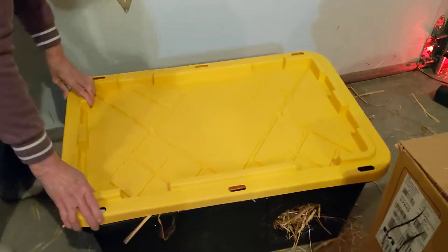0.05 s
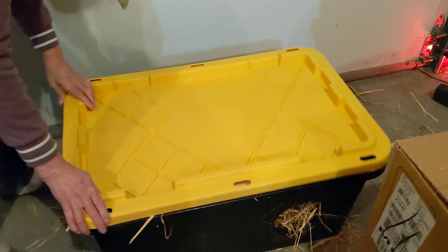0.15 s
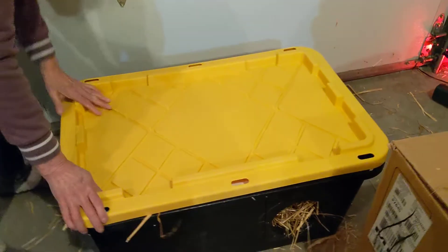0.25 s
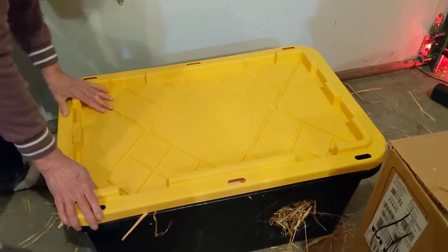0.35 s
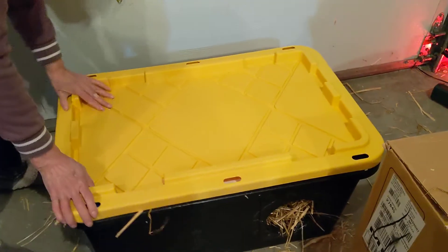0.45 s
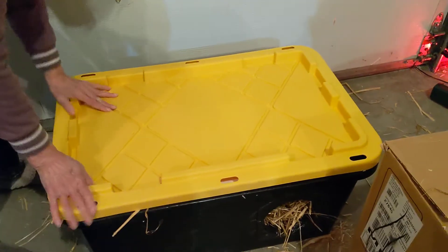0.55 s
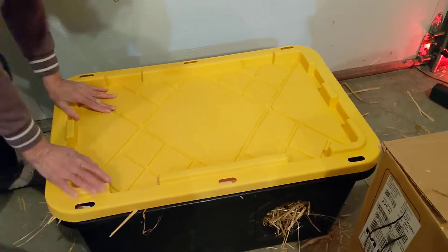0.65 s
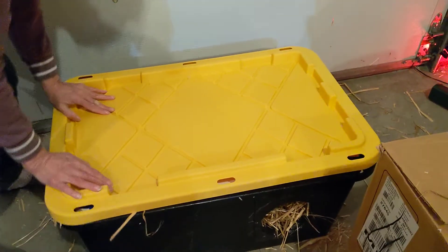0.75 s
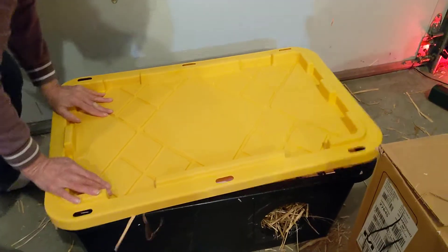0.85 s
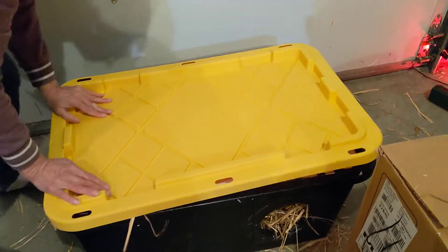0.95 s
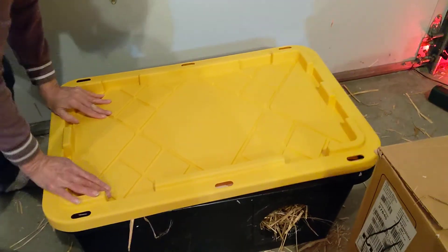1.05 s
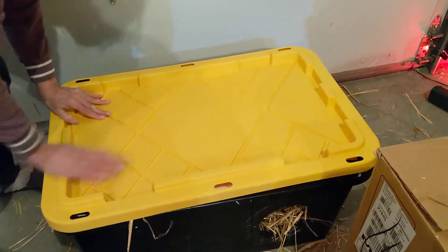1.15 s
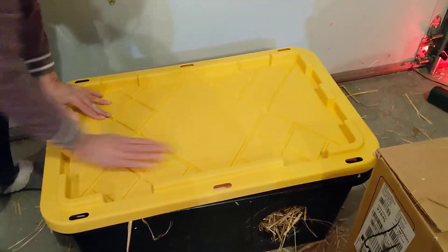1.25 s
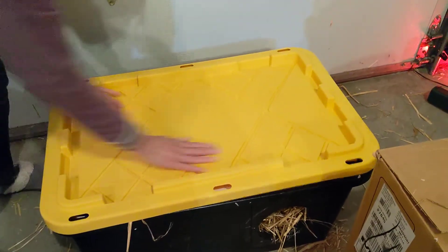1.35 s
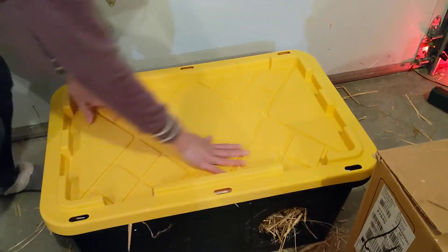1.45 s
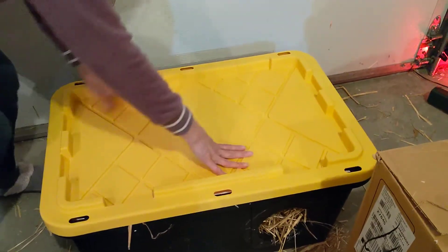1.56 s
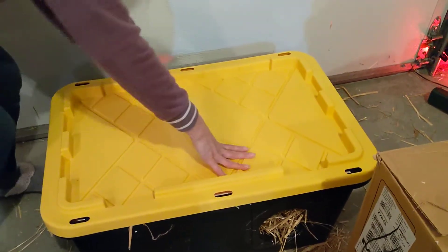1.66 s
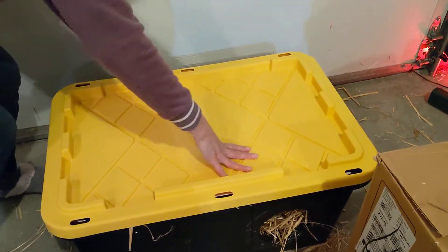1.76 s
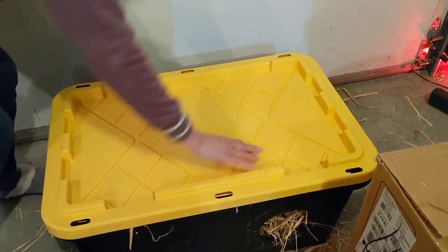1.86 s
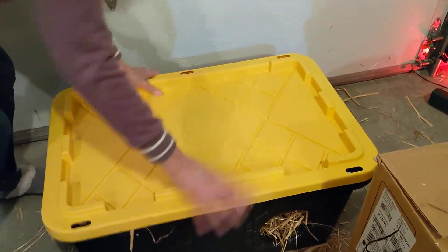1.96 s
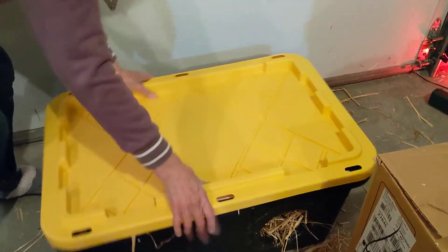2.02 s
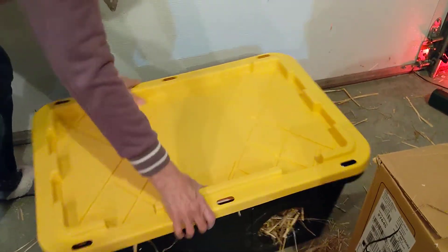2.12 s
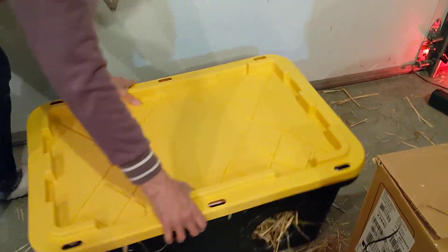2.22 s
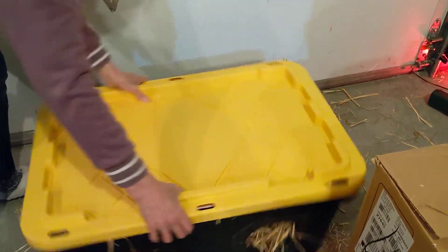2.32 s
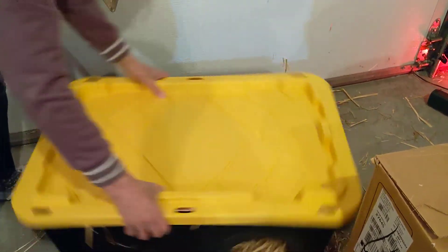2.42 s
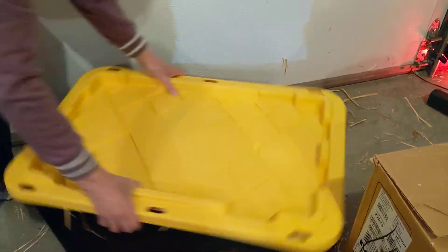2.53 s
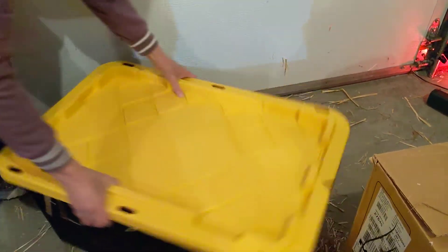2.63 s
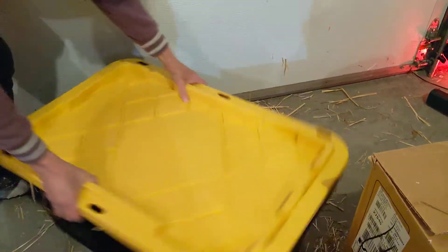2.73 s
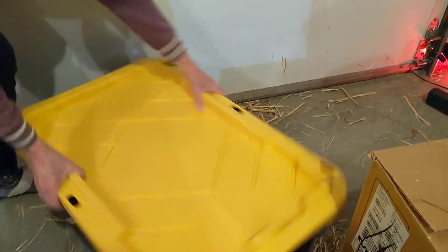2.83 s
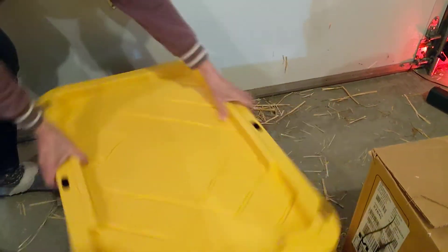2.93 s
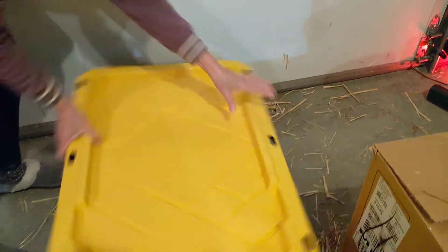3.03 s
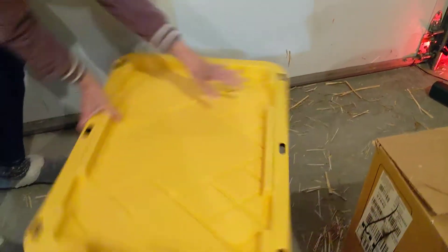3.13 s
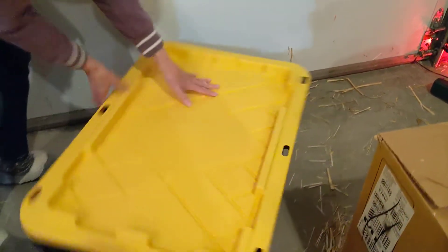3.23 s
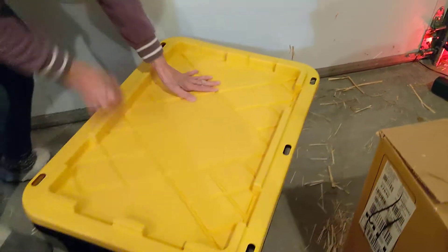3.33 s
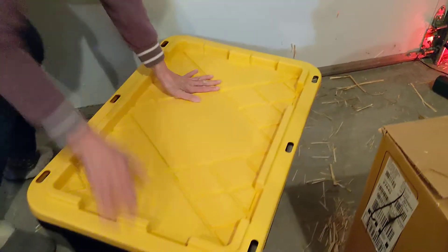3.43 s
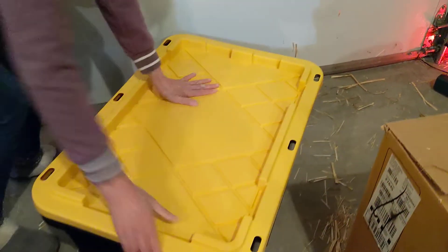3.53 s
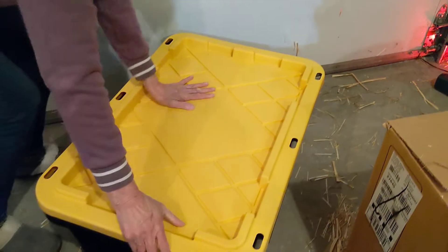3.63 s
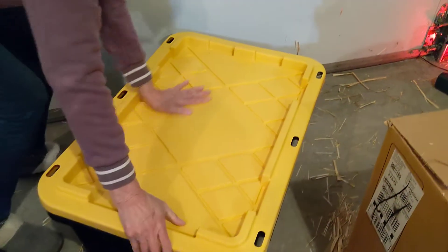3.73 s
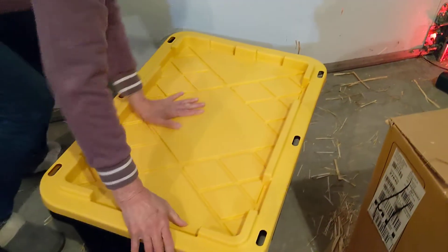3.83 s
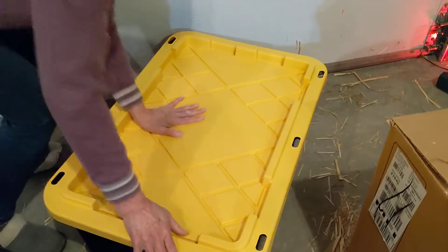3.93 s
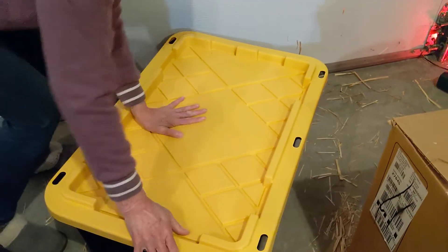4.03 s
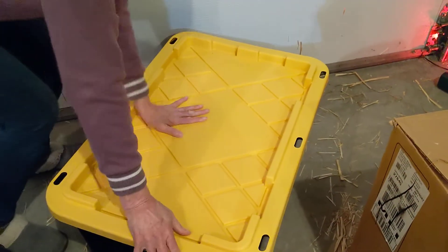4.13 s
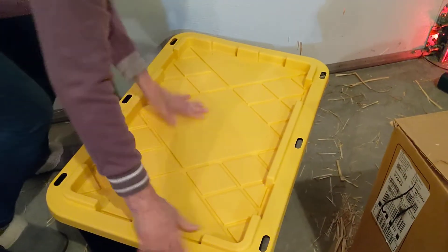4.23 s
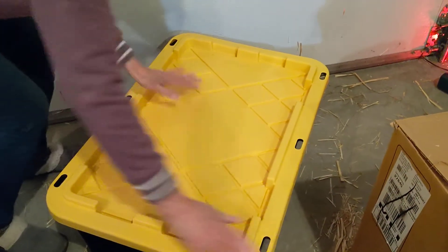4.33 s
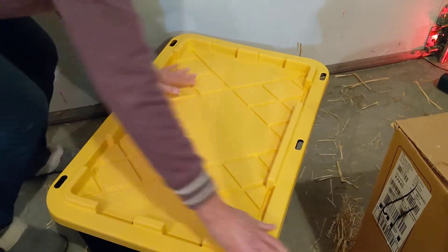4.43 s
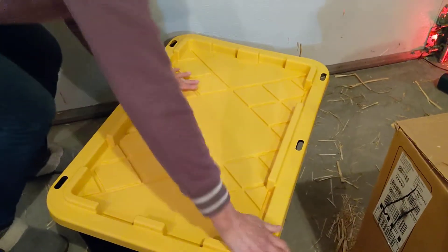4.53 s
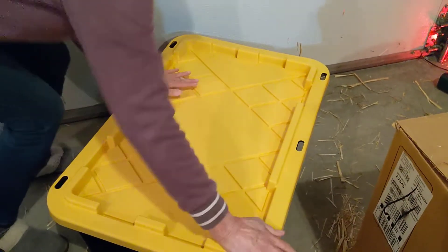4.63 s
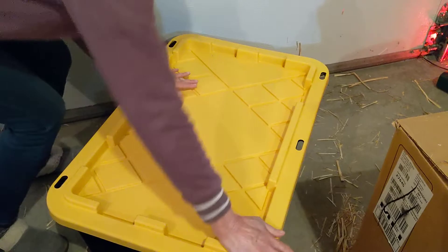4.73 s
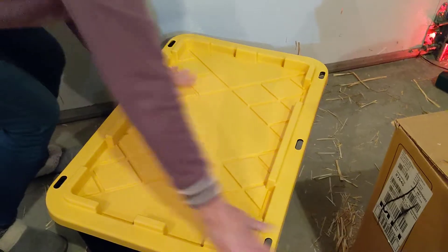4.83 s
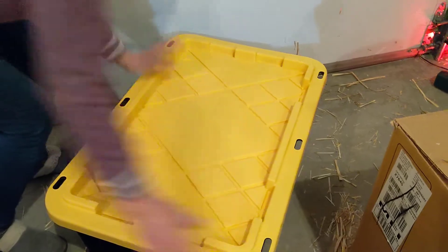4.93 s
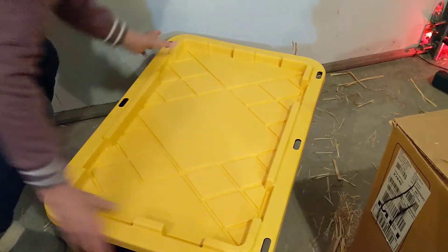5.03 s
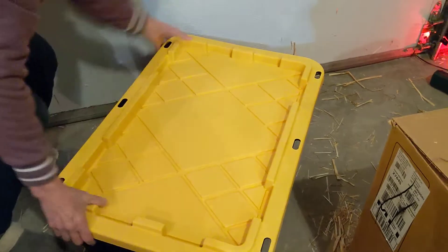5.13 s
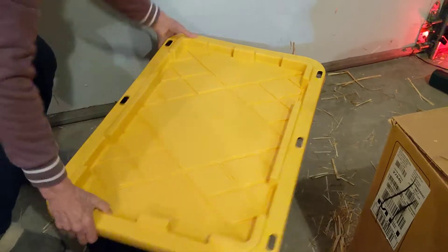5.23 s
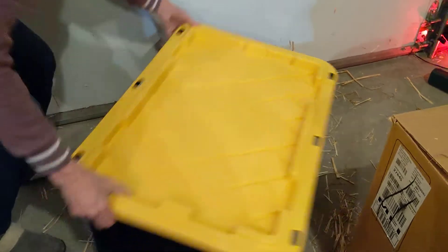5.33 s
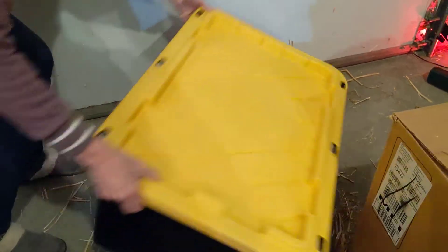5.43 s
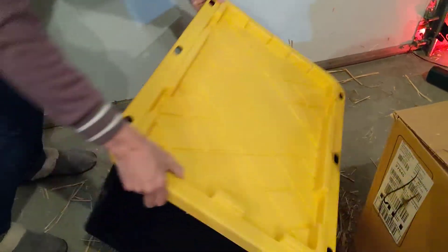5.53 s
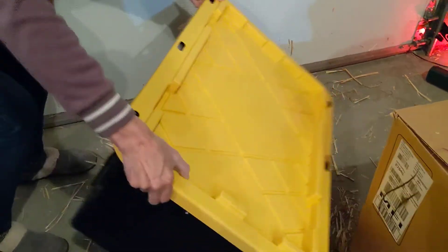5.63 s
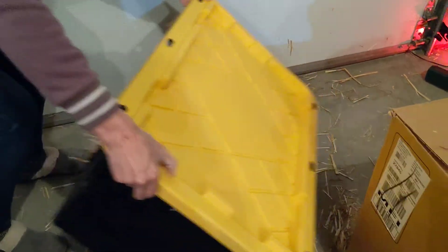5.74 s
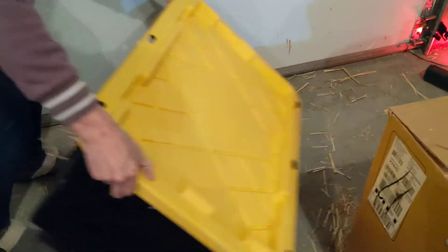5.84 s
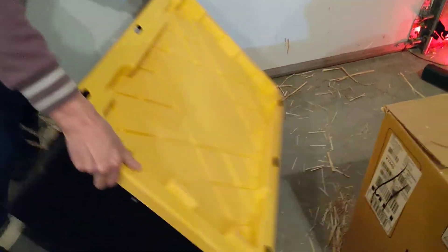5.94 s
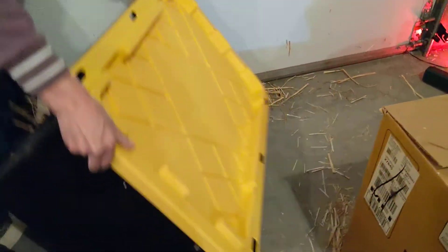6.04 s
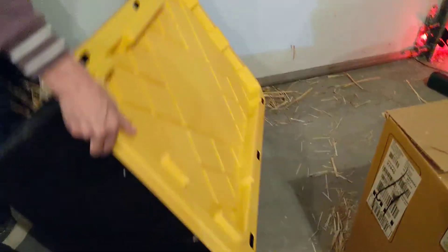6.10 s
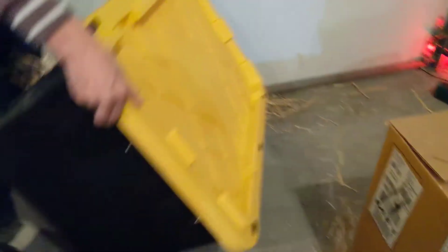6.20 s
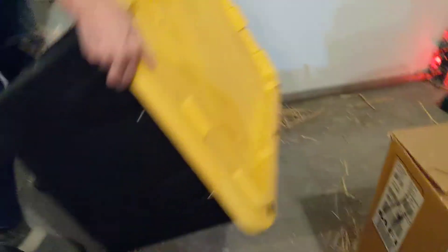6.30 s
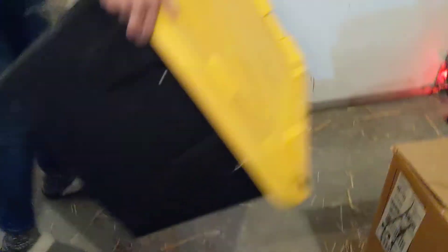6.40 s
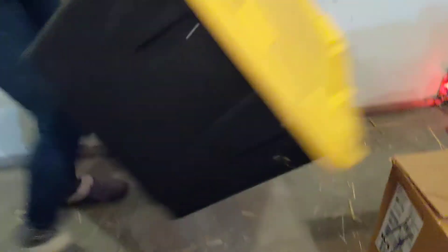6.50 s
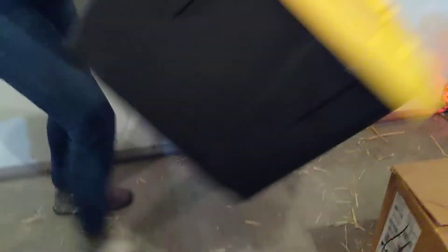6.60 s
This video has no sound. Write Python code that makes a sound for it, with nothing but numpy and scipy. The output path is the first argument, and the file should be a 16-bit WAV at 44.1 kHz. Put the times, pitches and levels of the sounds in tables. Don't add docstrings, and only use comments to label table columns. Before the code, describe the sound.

Loud plastic catches crack shut, a big storage tote grinds and squeals round on a dusty floor, a harder double snap follows, then quieter scraping.

```python
import sys
import numpy as np
from scipy import signal
from scipy.fft import rfft, irfft, next_fast_len
from scipy.io import wavfile
from scipy.ndimage import uniform_filter1d, map_coordinates

SR = 44100
rng = np.random.default_rng(int(sys.argv[2]) if len(sys.argv) > 2 else 0)


def digitize_waveform(pressure):
    field = np.atleast_2d(pressure).T
    bounded = np.clip(field, -1, 1)
    quanta = np.round(bounded * 32767).astype(np.int16)
    wavfile.write(sys.argv[1], SR, quanta)


def to_linear_factor(level_db):
    exponent = np.asarray(level_db, float) / 20
    return 10 ** exponent


N = 294014


def unit(x):
    return x / np.sqrt(np.mean(x ** 2) + 1e-20)


def along(points, hz):
    f, v = np.transpose(points)
    return np.interp(np.log(hz + 1), np.log(f + 1), v)


def gains(tables):
    t = np.arange(N) / SR
    total = 0
    for rows in tables:
        s, *columns = np.transpose(rows)
        total = total + to_linear_factor([np.interp(t, s, db, left=-120, right=-120) for db in columns])
    return uniform_filter1d(total, size=301, axis=1, mode="nearest")


def filtered(x, response):
    m = next_fast_len(x.shape[-1] + 8192)
    spectrum = rfft(x, m) * response(np.fft.rfftfreq(m, 1 / SR))
    return irfft(spectrum, m)[..., :x.shape[-1]]


def modes(table):
    def response(f):
        total = 0
        for k, (centre, width, db) in enumerate(table):
            damping = 1j * f * width
            total = total + (-1) ** k * to_linear_factor(db) * damping / (centre * centre - f * f + damping + 1e-9)
        return total
    return response


def twice(table):
    return lambda hz: modes(table)(hz) ** 2 / (1 + abs(modes(table)(hz)))


def colour(points):
    return lambda hz: to_linear_factor(along(points, hz))


# f/Hz, correlation
PORT_LIKENESS = [(25, 1), (60, 0.97), (125, 1), (250, 0.9), (500, .75), (1000, 0.52), (2500, 0.25),
                 (4500, 0.025), (15000, .01)]


def ports(pair):
    turn = lambda hz: np.arccos(np.clip(along(PORT_LIKENESS, hz), -1, 1)) / 2
    mid, side = filtered(pair, lambda hz: np.array([np.cos(turn(hz)), np.sin(turn(hz))]))
    return np.array([mid + side, mid - side])


def slips(grain_db, clump_db, clump_rate, size=N):
    strength = to_linear_factor(grain_db * np.minimum(rng.exponential(size=size), 5))
    force = rng.standard_normal((2, size)) * strength
    wander = rng.standard_normal(int(size * 400 / SR) + 9)
    clumps = map_coordinates(wander, [np.arange(size) * min(clump_rate, 400) / SR])
    return force * to_linear_factor(clump_db * np.tanh(clumps / 2) * 2)


# f/Hz, t60/s
WALL_DECAY = [(100, 0.87), (300, 0.65), (1500, 0.67), (5000, 0.71), (9000, .55), (15000, .4)]


def room(x, wet_db):
    hz, t, z = signal.stft(rng.standard_normal((2, SR)), SR, nperseg=256)
    decay = to_linear_factor(-60 * t / along(WALL_DECAY, hz)[:, None])
    tail = signal.istft(z * decay, SR, nperseg=256)[1]
    tail = tail / np.linalg.norm(tail[0])
    tail = ports(np.pad(tail, ((0, 0), (250, 0))))
    return to_linear_factor(wet_db) * signal.fftconvolve(x[None], tail, axes=1)


# f/Hz, level/dB per Hz
AIR_SPECTRUM = [(60, -39), (120, -10.5), (200, -17.5), (400, -18), (1500, -22.5), (4000, -27.5),
                (8000, -29), (16000, -34)]
# t/s, level/dB
AIR_LEVEL = [(0, -51), (1.2, -59), (1.7, -69.5), (2, -60), (3.5, -68.5), (4.3, -57), (4.5, -73),
             (5.05, -68), (5.4, -62.5), (6, -62.5), (6.67, -64.5)]


def room_air():
    air = filtered(rng.standard_normal((2, N)), colour(AIR_SPECTRUM))
    return gains([AIR_LEVEL])[0] * unit(ports(air))


# f/Hz, level/dB per Hz
RUMBLE_SPECTRUM = [(15, -13), (30, -1.5), (55, 1.5), (90, -3), (120, -21.5), (240, -59.5)]
# t/s, level/dB
RUMBLE_LEVEL = [(0.0, -38.5), (0.15, -52), (0.3, -46), (0.37, -46.5), (0.46, -60.5), (0.82, -52),
                (0.87, -38.5), (1.24, -65), (1.34, -64), (1.39, -54), (1.43, -37), (1.59, -43.5),
                (1.76, -58), (1.82, -47), (1.89, -49), (2.01, -55), (2.1, -53), (2.41, -55), (2.58, -50),
                (2.65, -53.5), (2.73, -48.5), (2.9, -56), (3.19, -51), (3.23, -59), (3.3, -50),
                (3.57, -50.5), (3.62, -66.5), (3.79, -57), (3.9, -62), (3.95, -38), (3.99, -29.5),
                (4.05, -43.5), (4.19, -54.5), (4.29, -47.5), (4.44, -64.5), (4.68, -44), (4.83, -56),
                (5.09, -66), (5.16, -52.5), (5.31, -64), (5.44, -52), (5.79, -51), (5.89, -64),
                (6.67, -58.5)]


def handling_rumble():
    surges = slips(grain_db=1.0, clump_db=2.1, clump_rate=4)
    return gains([RUMBLE_LEVEL])[0] * unit(ports(filtered(surges, colour(RUMBLE_SPECTRUM))))


# t/s, peak level/dB, f/Hz, t60/s
PALM_PATS = [(0.264, -27, 127, 0.095), (0.691, -34, 140, 0.12), (1.337, -39, 40.4, 0.12),
             (1.388, -32, 80.7, 0.099), (1.409, -31, 61.9, 0.12), (1.444, -28, 144, 0.16),
             (1.734, -39, 212, 0.12), (1.813, -37, 86.1, 0.13), (3.609, -32, 40.6, 0.13),
             (3.93, -37, 119, 0.13), (4.506, -34, 124, 0.1), (4.582, -30, 109.5, 0.14),
             (4.639, -35, 45.8, 0.12), (4.694, -36, 40.4, 0.11), (5.152, -35, 153, 0.14),
             (5.305, -33, 144, 0.19), (5.399, -44, 40.4, 0.12), (5.714, -31, 236, 0.099)]


def pats():
    out, t = np.zeros(N + SR), np.arange(SR // 2) / SR
    for s, db, hz, t60 in PALM_PATS:
        note = np.sin(2 * np.pi * hz * t)
        note += 0.91 * np.sin(2 * np.pi * 1.7 * hz * t) * to_linear_factor(-60 * t / 0.08)
        note += 0.5 * np.sin(2 * np.pi * 330 * t) * to_linear_factor(-60 * t / 0.056)
        envelope = to_linear_factor(db - 5 - 60 * t / t60) * (1 - np.exp(-t / 0.0035))
        out[round(s * SR):][:len(t)] += envelope * note
    return out[:N]


# t/s, level/dB, resonance f/Hz
FOOT_SQUEAL = [(2.3, -48.5, 2580), (2.474, -25.5, 2434), (2.63, -18, 2630), (2.636, -28, 2674),
               (2.666, -14, 2784), (2.77, -19.5, 2730), (2.82, -38.5, 2540), (2.858, -37, 2600),
               (2.878, -20, 2590), (2.914, -26, 2670), (3.104, -38.5, 2637), (3.3, -40, 2660)]


def squeal():
    s, db, hz = np.transpose(FOOT_SQUEAL)
    force = slips(grain_db=3.5, clump_db=-0.5, clump_rate=130)
    high = np.clip((np.interp(np.arange(N) / SR, s, hz) - 2400) / 500, 0, 1)
    slow = unit(filtered(force, twice([(2500, 700, 0)])))
    fast = unit(filtered(force, twice([(2890, 560, 0)])))
    level = gains([np.c_[s, db + 1.5]])[0]
    return level * (slow * np.sqrt(1 - high) - fast * np.sqrt(high))


# t/s, hollow boom level/dB, lid panel level/dB, ridge level/dB, grit hiss level/dB
STROKES = [
    [(0.0, -32, -38, -51.5, -44.5), (0.034, -49, -48, -52.5, -57.5), (0.084, -50.5, -40.5, -53.5, -55),
     (0.118, -47, -49, -54, -59), (0.218, -44, -39, -43, -46.5), (0.23, -36, -35, -41.5, -35.5)],
    [(0.262, -33, -40, -34, -32), (0.296, -47, -51, -47.5, -49.5), (0.332, -51, -52, -48.5, -39.5),
     (0.44, -65, -60, -75, -62), (0.538, -44.5, -45.5, -54, -50), (0.654, -78, -64, -62, -47),
     (0.71, -51, -66.5, -66, -44.5), (0.766, -63, -57, -59.5, -54.5), (0.86, -36, -46, -46, -43)],
    [(1.28, -82, -72, -79, -58.5), (1.31, -74.5, -66, -67.5, -71.5), (1.376, -57, -59.5, -57, -52),
     (1.416, -42, -50, -55, -40.5), (1.46, -35.5, -48, -51.5, -38), (1.498, -37, -39, -40, -37)],
    [(1.525, -45, -39, -48, -40), (1.673, -56, -60.5, -69, -65), (1.717, -66.5, -63, -76, -70),
     (1.739, -48.5, -53, -76, -65.5), (1.791, -57, -71, -74, -66), (1.817, -41, -52.5, -57, -57.5),
     (1.881, -47, -58, -57, -45.5), (1.941, -62.5, -52, -59, -50), (1.995, -55, -57.5, -65.5, -54),
     (2.067, -39, -34.5, -40.5, -42), (2.151, -42, -33.5, -35, -33.5), (2.319, -47, -41.5, -47, -43.5),
     (2.363, -47, -34, -33.5, -34), (2.669, -43.5, -31, -25, -26.5), (2.773, -48, -33.5, -27.5, -25.5),
     (2.817, -50, -35, -38, -35), (2.86, -48.5, -37, -39, -30.5)],
    [(2.865, -41, -35, -32.5, -28), (2.897, -52, -38.5, -32.5, -28), (2.977, -42, -36.5, -33.5, -28.5),
     (3.095, -45, -30, -30, -26.5), (3.255, -46.5, -33.5, -38.5, -31), (3.323, -41, -33.5, -39, -32.5),
     (3.483, -61.5, -58.5, -61, -57), (3.557, -66.5, -65, -54.5, -44), (3.607, -48.5, -53.5, -53.5, -43.5),
     (3.663, -55, -52, -53, -45.5), (3.751, -71, -65.5, -47, -42.5), (3.897, -71, -61.5, -55, -36.5),
     (3.951, -40.5, -50.5, -57.5, -56), (3.955, -38.5, -44.5, -46.5, -48)],
    [(4.42, -62, -75, -76, -67.5), (4.47, -84, -87, -78, -84), (4.5, -72, -78, -76, -78),
     (4.52, -47, -70, -68, -57.5), (4.55, -53.5, -83, -75, -65.5), (4.58, -66, -72, -78, -87),
     (4.59, -43, -57, -56, -52), (4.61, -50, -65, -59, -45.5), (4.67, -45.5, -46.5, -56.5, -59.5),
     (4.79, -73, -72, -72.5, -77.5), (4.87, -62.5, -62, -59, -46), (4.98, -78, -81, -86, -70),
     (5.12, -79, -80, -91, -81), (5.14, -55.5, -54, -58, -61), (5.17, -51.5, -62, -61, -50),
     (5.25, -54.5, -57, -61.5, -48), (5.34, -57, -63, -60, -52.5), (5.38, -52, -54, -59, -49.5),
     (5.53, -49.5, -36, -39.5, -31.5), (5.69, -57, -41.5, -39.5, -33.5), (5.72, -43, -38.5, -38, -32.5),
     (5.91, -95, -68.5, -76, -70.5), (6.06, -80, -64.5, -64, -61.5), (6.42, -80, -76.5, -83.5, -78),
     (6.51, -65.5, -82, -77, -62), (6.67, -83, -90, -87, -76)],
]
# t/s, tilt of the hiss's top level/dB
DUST_TILT = [(0, 9), (.35, -4), (.7, 4), (1.5, 3), (2.2, 2), (2.7, 4), (3.3, -1), (3.85, 6), (4.6, 1),
             (4.9, 2.5), (5.25, 1), (5.6, -10.5), (6.1, -4), (6.5, 1)]
# f/Hz, level/dB per Hz
GRIT_SPECTRUM = [(1800, -31), (2800, -6), (3800, 0), (6000, 0), (9000, -4), (13000, -3.5), (16500, -6)]
# f/Hz, width f/Hz, level/dB
CAVITY_MODES = [(129, 33, -1), (176, 86, 0), (254.6, 164, -3)]
# f/Hz, width f/Hz, level/dB
PANEL_MODES = [(420, 100, -3), (519, 80, 0.5), (656, 114, 1), (892, 150, 0), (1152, 340, -3.5)]
# f/Hz, width f/Hz, level/dB
TIPPED_MODES = [(403, 110, -5.5), (600, 160, -3.5), (858, 196, -1), (1220, 210, -4.5)]
# f/Hz, width f/Hz, level/dB
RIDGE_MODES = [(1700, 720, 0), (2500, 310, 4.5), (3380, 1500, -2)]


def friction():
    tip_s = 5.35
    boom, panel, ridge, hiss = gains(STROKES)
    grit = unit(filtered(slips(grain_db=2.5, clump_db=1.0, clump_rate=70), colour(GRIT_SPECTRUM)))
    dust = filtered(grit, lambda hz: 1 / (1 + (8000 / (hz + 1)) ** 4))
    dry = boom * unit(filtered(slips(grain_db=2.5, clump_db=3.0, clump_rate=28), twice(CAVITY_MODES)))
    force = slips(grain_db=1.0, clump_db=2.5, clump_rate=45)
    flat = unit(filtered(force, twice(PANEL_MODES)))
    tipped = unit(filtered(force, twice(TIPPED_MODES)))
    dry += panel * np.where(np.arange(N) < tip_s * SR, flat, tipped)
    ridge_force = slips(grain_db=2.5, clump_db=1.5, clump_rate=180)
    dry += to_linear_factor(6.0) * ridge * unit(filtered(ridge_force, twice(RIDGE_MODES)))
    dry += hiss * (grit + (gains([DUST_TILT])[0] - 1) * dust)
    dry += squeal()
    return to_linear_factor(0.2) * ports(dry) + room(dry[0], wet_db=-12)[:, :N]


# t/s, peak level/dB, thud level/dB, brightness level/dB, rim ring f/Hz, room level/dB
CATCH_SNAPS = [
    (0.879, 1, -19.5, -2, 1520, -4.5),
    (0.894, -6, -23.5, -4.5, 1290, 1.5),
    (0.906, -10, -27, -3, 1280, -4),
    (3.968, 0.5, -13, -3, 1420, -6),
    (3.985, 2.5, -16, 0, 1700, -5.5),
]
CATCH_CLICKS = [
    (0.236, -8, -19.5, -10, 1440, -8.5),
    (1.503, -16.5, -18.5, -13.5, 1700, -5.5),
    (4.003, -6.5, -21.5, -2.5, 1850, 1),
    (4.011, -8, -23, -5, 2300, 2),
    (0.4, -29, -22.5, -6.5, 4000, -2),
    (0.38, -27, -25, -7.5, 2600, -8.5),
]
CONTACT_TICKS = [(0.003, -26.5, -10.5, -1.5, 1670, -9), (0.14, -30, -20.5, -14.5, 1533, -8.5),
                 (0.323, -24, -38, -7, 2940, -8.5), (0.79, -24, -29, 3, 2630, -7),
                 (0.833, -19, -15.5, -2.5, 724, -7.5), (1.335, -41.5, -20, -3, 1460, -9),
                 (1.409, -27, -5, -2, 710, -7), (2.874, -14, -46, -6, 2640, -5),
                 (4.591, -33.5, -9.5, -1.5, 2360, -7.5), (4.642, -28, -10, -5.5, 1150, -3.5),
                 (4.671, -35, -2.5, 0, 2460, -4.5), (5.135, -42, -7, -3, 815, -13),
                 (5.156, -31.5, -8, 0, 756, -10.5), (5.392, -28, -23, -1.5, 610, -5),
                 (.163, -30, -17, 6, 2500, -5), (.225, -25, -20, 11, 2193, -9),
                 (.864, -15, -8, -6, 640, -9), (3.585, -40.5, -5, -17.5, 420, -9.5),
                 (3.652, -32, -5.5, -17, 890, -7.5), (3.959, -19, -11, -10.5, 1430, -7),
                 (4.282, -33, -2.5, -15, 796, -11), (5.82, -43, -22.5, 6, 900, -9.5)]
# f/Hz, level/dB per Hz
RIM_SPECTRUM = [(150, -26), (400, -3), (700, -1), (1300, -2.5), (2500, -2), (4500, -3.5), (9000, -27),
                (16000, -28)]
# f/Hz, level/dB per Hz
CRACK_SPECTRUM = [(1500, -19.5), (4000, -8), (7000, 2), (11000, 0), (16000, -7.5)]


def catches(events, t60, blow, ring_db):
    out, t = np.zeros((2, N + 2 * SR)), np.arange(SR // 5) / SR
    fade = to_linear_factor(-60 * t / t60) * (1 - np.exp(-t / 0.00039))
    impulse = signal.unit_impulse(len(t), 40)
    for s, db, thud_db, bright_db, hz, wet_db in events:
        ring = modes([(hz, 0.16 * hz, ring_db)])

        def body(f):
            rim = colour(RIM_SPECTRUM)(f) * (1 + ring(f))
            return rim + to_linear_factor(bright_db - 6) * colour(CRACK_SPECTRUM)(f)

        force = slips(grain_db=1, clump_db=1, clump_rate=250, size=len(t))
        rattle = fade * unit(filtered(force, body))
        pulse = unit(filtered(impulse, body)) * np.linalg.norm(fade) / np.sqrt(len(t))
        thud = unit(filtered(rng.standard_normal(len(t)), modes(CAVITY_MODES)))
        thud = to_linear_factor(thud_db + 0.5 - 60 * t / 0.2) * (1 - np.exp(-t / 0.0045)) * thud
        tail = room(pulse, wet_db)
        start = round(s * SR)
        out[:, start:][:, :len(t)] += to_linear_factor(db - 6) * (ports(rattle) + blow * pulse + thud)
        out[:, start:][:, :tail.shape[1]] += to_linear_factor(db - 6) * tail
    return out[:, :N]


def scene():
    background = room_air() + handling_rumble()
    palms = pats()
    near = friction() + palms + room(palms, wet_db=-10.5)[:, :N]
    near += catches(CONTACT_TICKS, t60=0.046, blow=0.19, ring_db=8.5)
    near += catches(CATCH_CLICKS, t60=0.072, blow=0.16, ring_db=11)
    near += catches(CATCH_SNAPS, t60=0.079, blow=0.095, ring_db=-0.5)
    return (near + background) * to_linear_factor([[0.3], [-0.3]])


def top_cut(x):
    return signal.sosfilt(signal.butter(12, 16940, fs=SR, output="sos"), x)


# f/Hz, width f/Hz, level/dB
CAPSULE_MODES = [(5736, 350, 11), (7460, 530, 7.4), (9640, 640, 7.9), (11600, 1000, 4.6), (14600, 900, 2)]
# t/s, depth level/dB, recovery t/s
GAIN_DUCKS = [
    (0.879, 1.5, 0.05),
    (3.974, 3, 0.067),
]


def record(dry):
    def microphone(hz):
        housing = 1 + sum(modes([m])(hz) * 0.5 for m in CAPSULE_MODES)
        return (hz < 15780) * to_linear_factor(-3 * hz / (hz + 4000)) * housing

    x = filtered(dry, microphone)
    t = np.arange(N) / SR
    for s, depth_db, recovery in GAIN_DUCKS:
        since = np.maximum(t - s, 0)
        x = x * to_linear_factor(-depth_db * (1 - np.exp(-since / 0.0047)) * np.exp(-since / recovery))
    x = x / (1 + np.abs(x / 0.99) ** 6) ** (1 / 6)
    return top_cut(x)


dry = scene()
out = record(dry)
digitize_waveform(out)
```